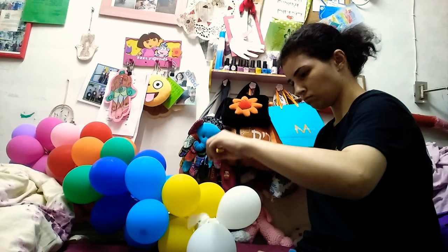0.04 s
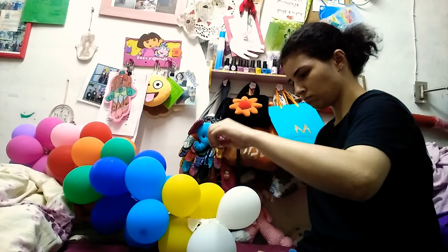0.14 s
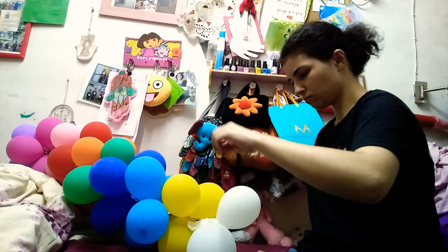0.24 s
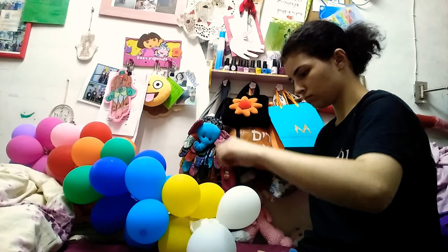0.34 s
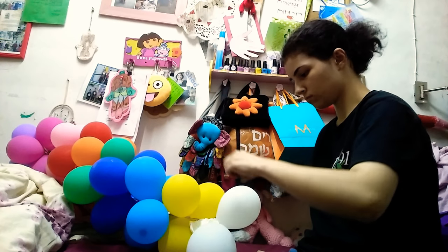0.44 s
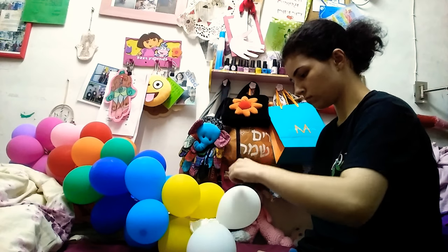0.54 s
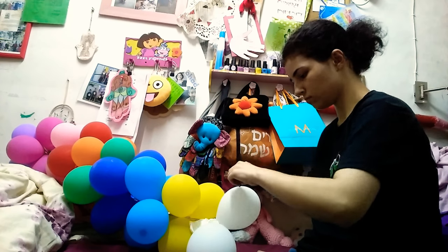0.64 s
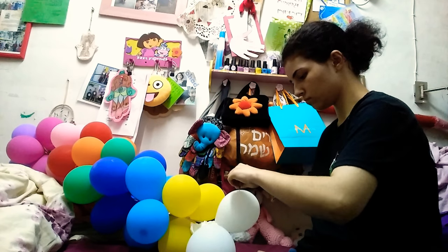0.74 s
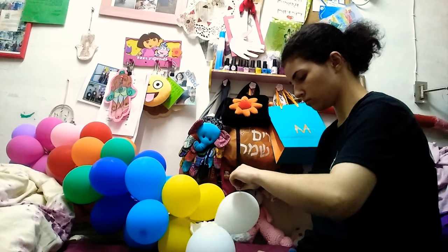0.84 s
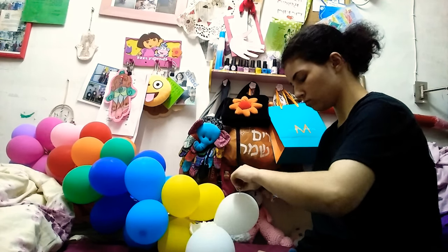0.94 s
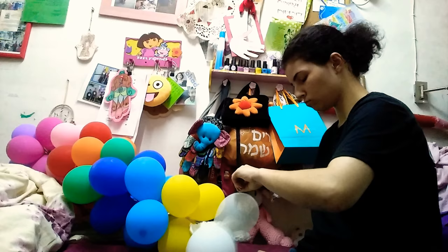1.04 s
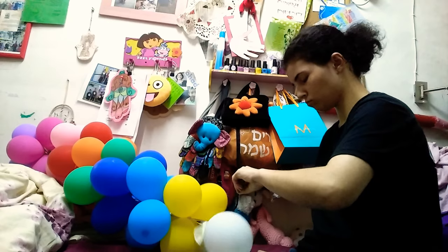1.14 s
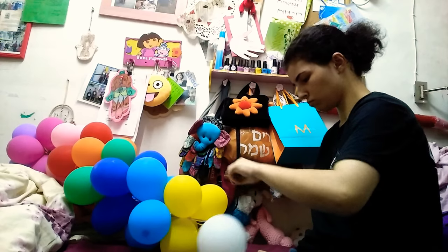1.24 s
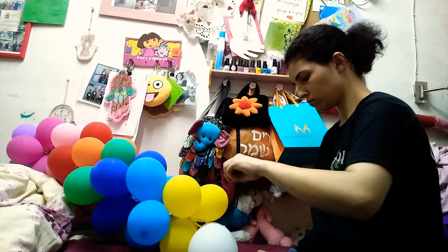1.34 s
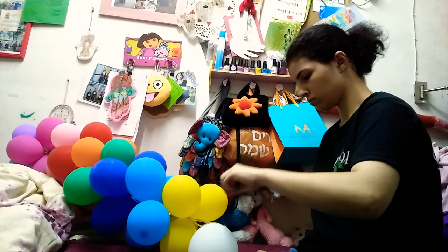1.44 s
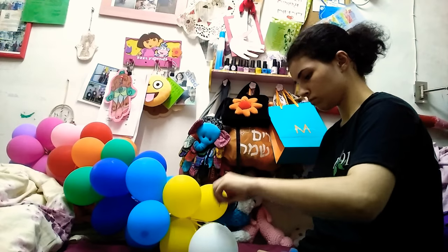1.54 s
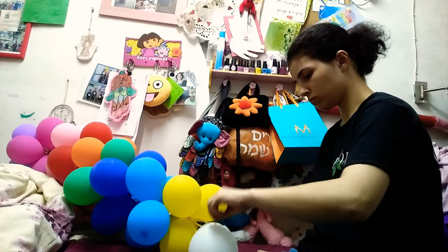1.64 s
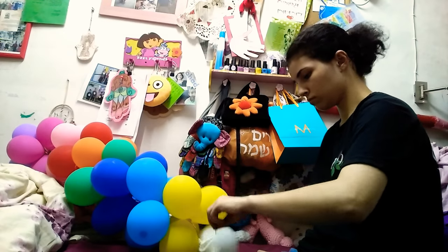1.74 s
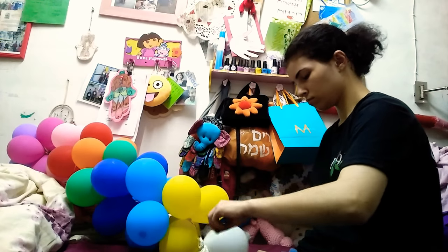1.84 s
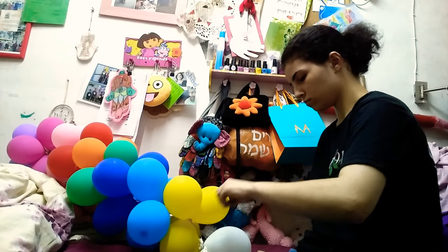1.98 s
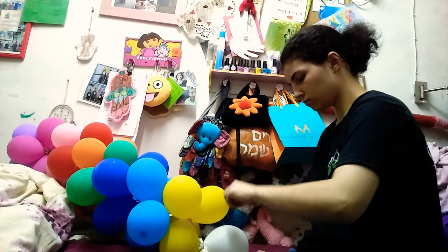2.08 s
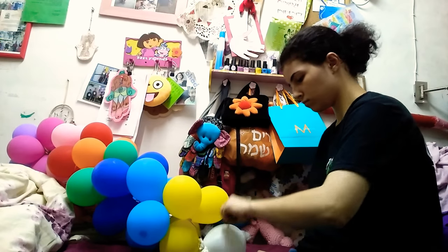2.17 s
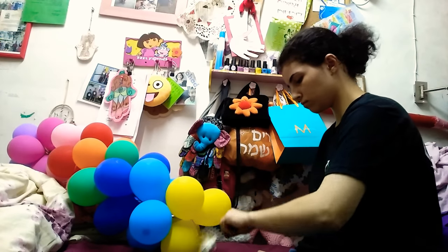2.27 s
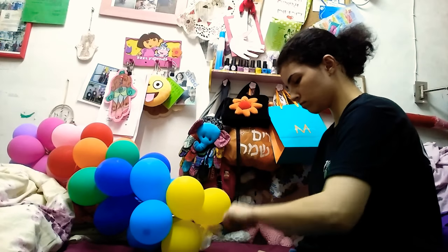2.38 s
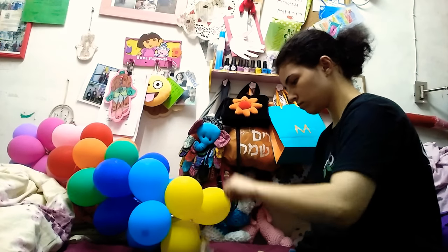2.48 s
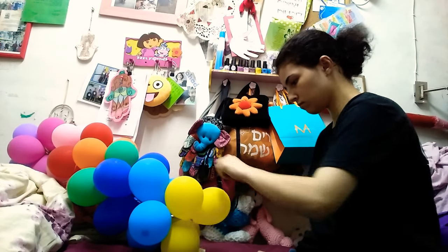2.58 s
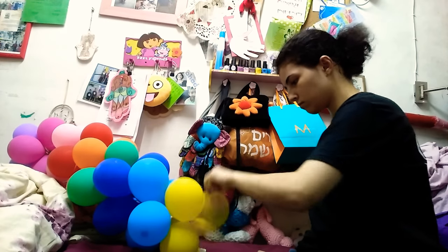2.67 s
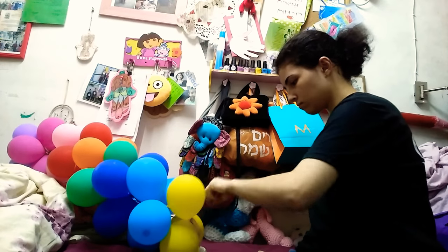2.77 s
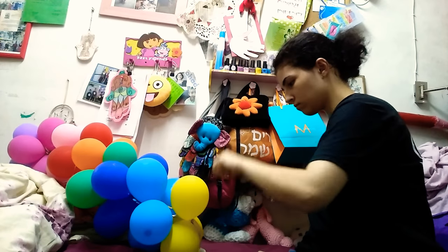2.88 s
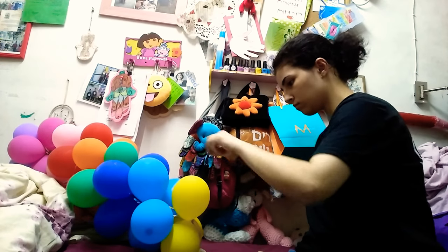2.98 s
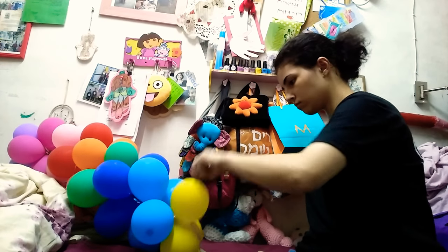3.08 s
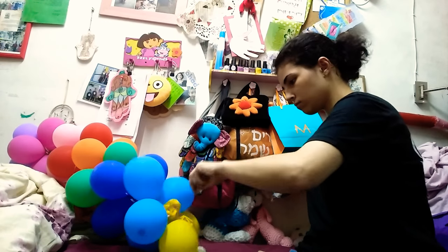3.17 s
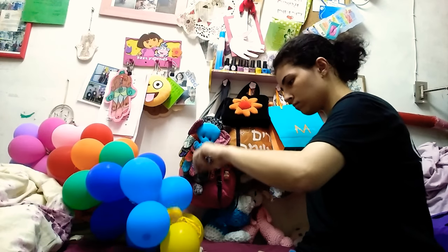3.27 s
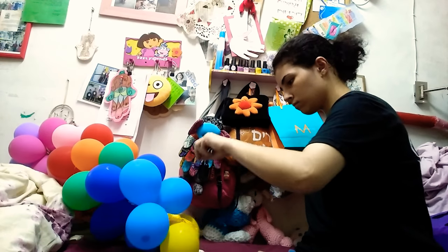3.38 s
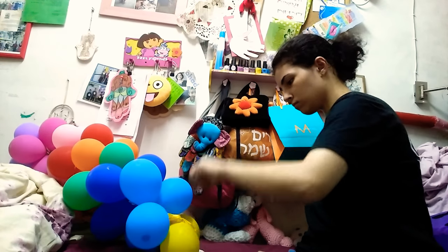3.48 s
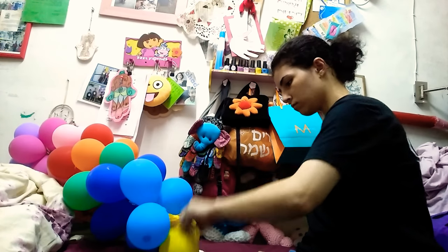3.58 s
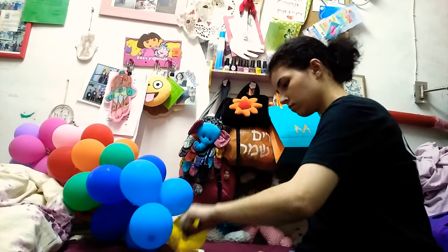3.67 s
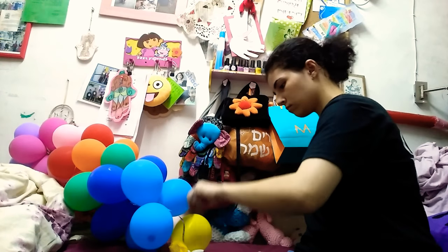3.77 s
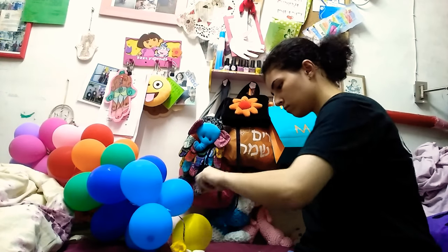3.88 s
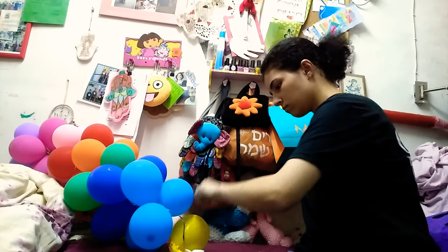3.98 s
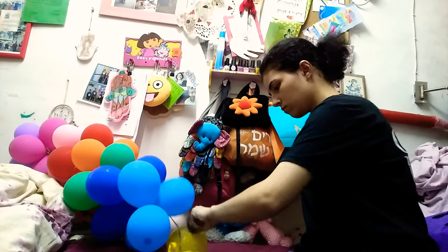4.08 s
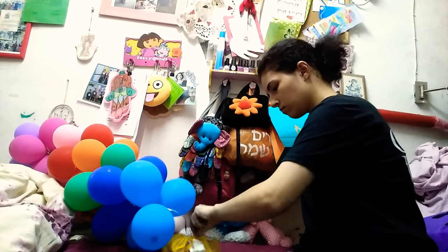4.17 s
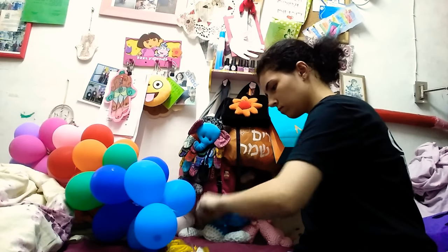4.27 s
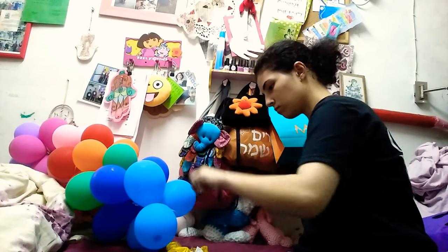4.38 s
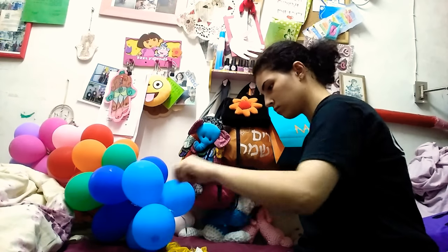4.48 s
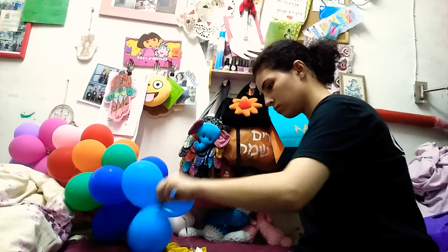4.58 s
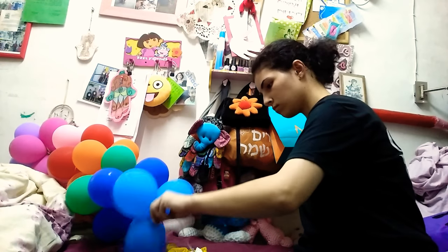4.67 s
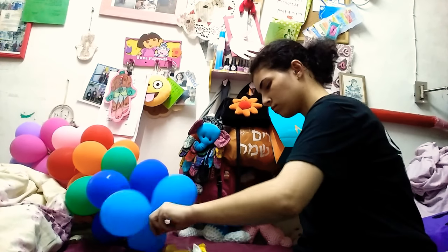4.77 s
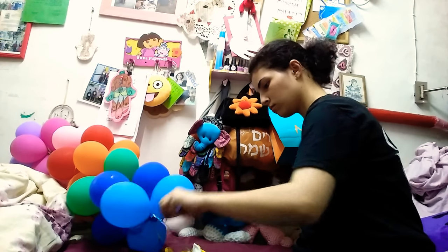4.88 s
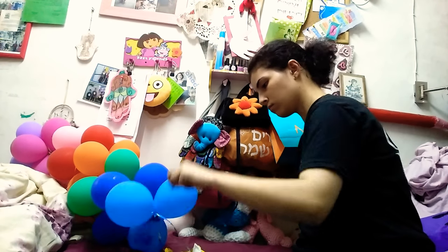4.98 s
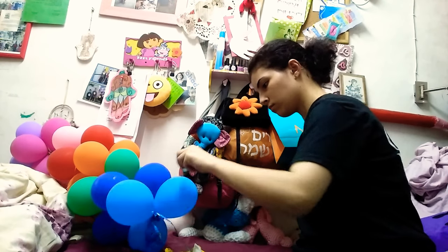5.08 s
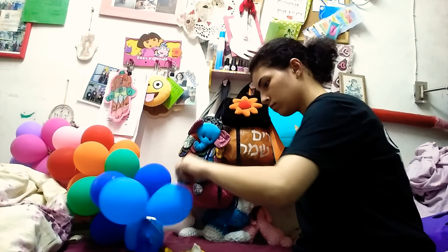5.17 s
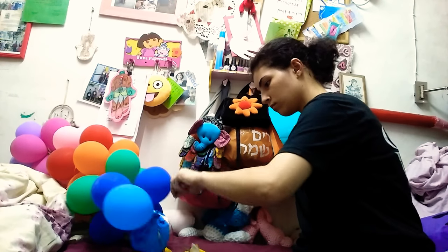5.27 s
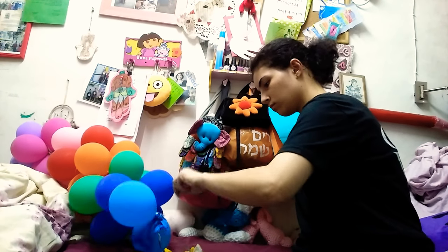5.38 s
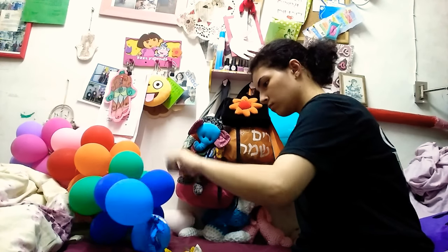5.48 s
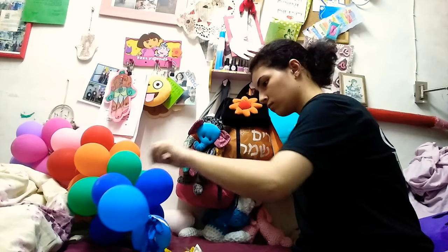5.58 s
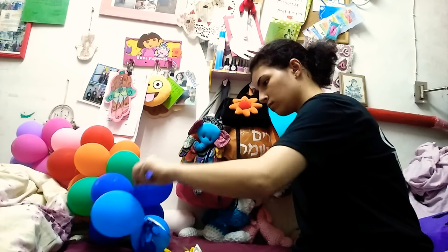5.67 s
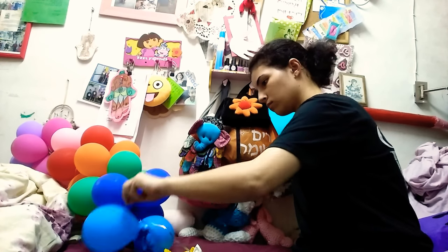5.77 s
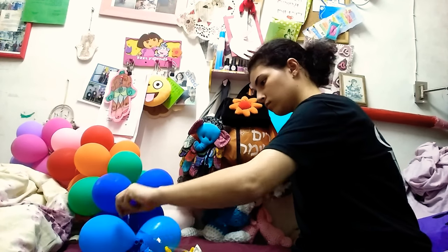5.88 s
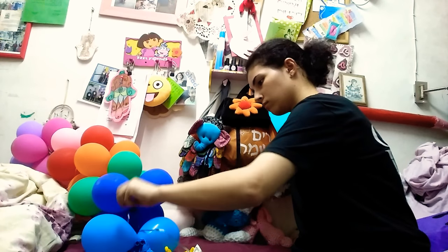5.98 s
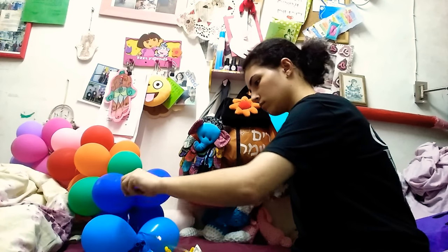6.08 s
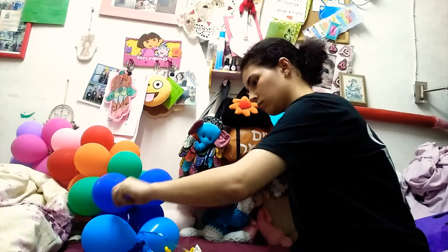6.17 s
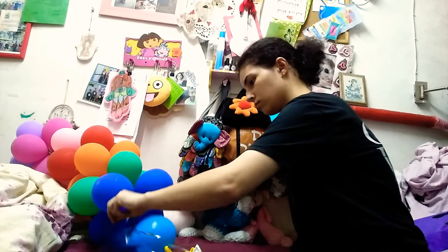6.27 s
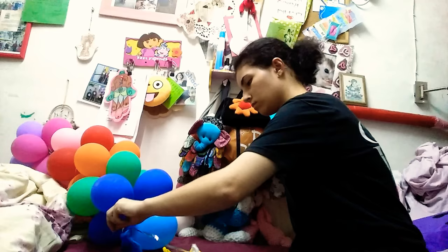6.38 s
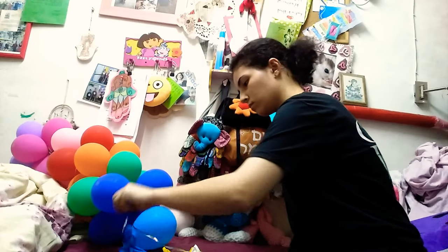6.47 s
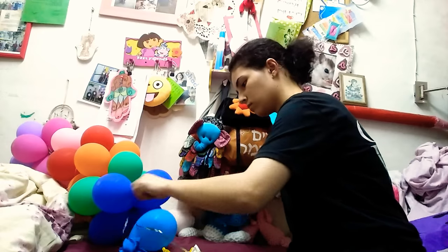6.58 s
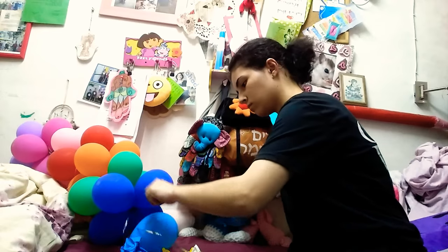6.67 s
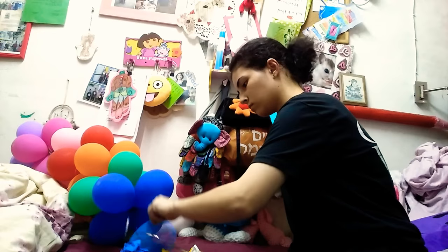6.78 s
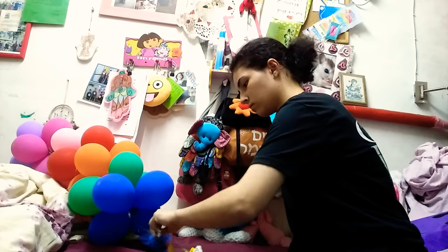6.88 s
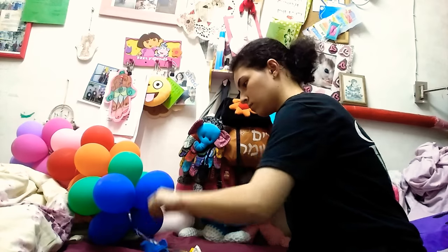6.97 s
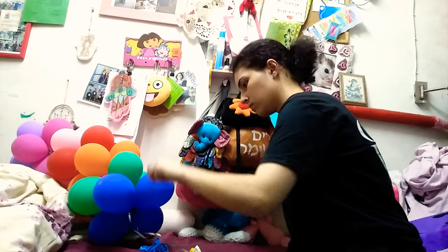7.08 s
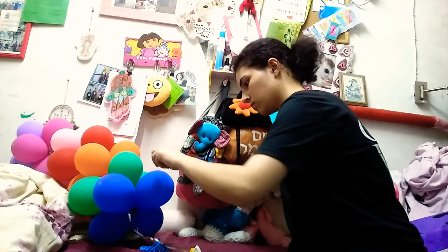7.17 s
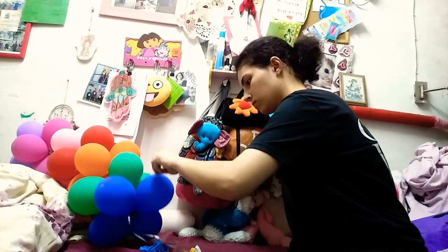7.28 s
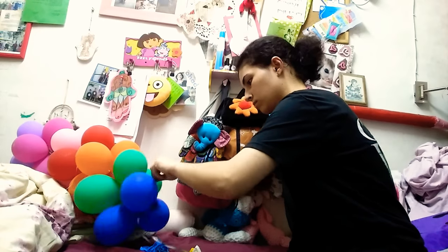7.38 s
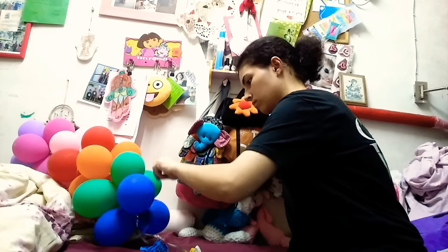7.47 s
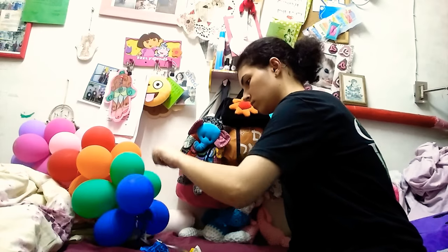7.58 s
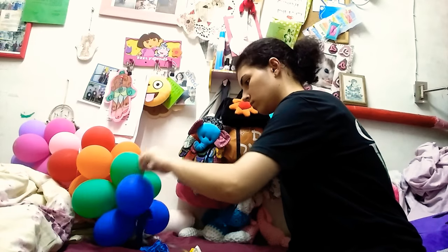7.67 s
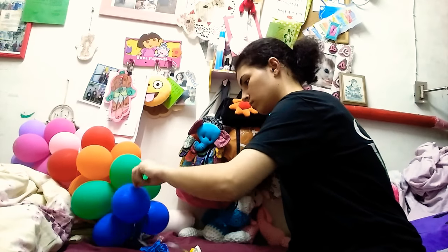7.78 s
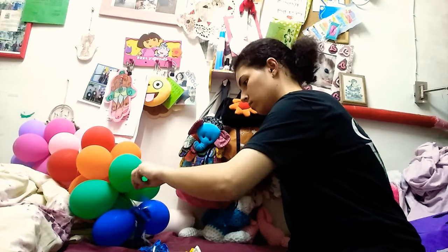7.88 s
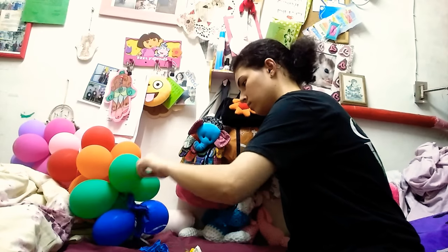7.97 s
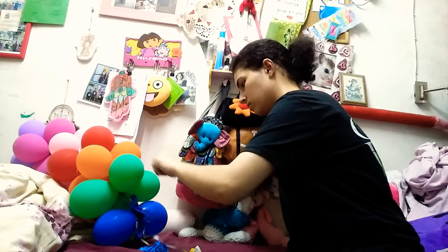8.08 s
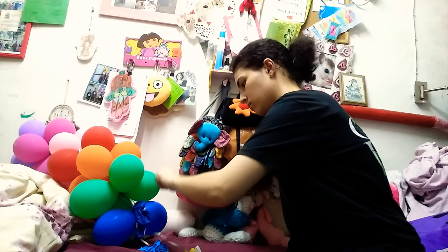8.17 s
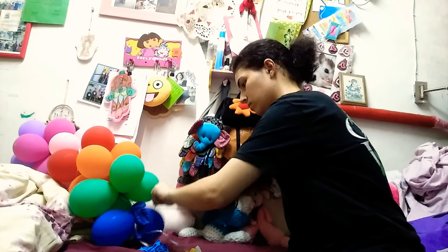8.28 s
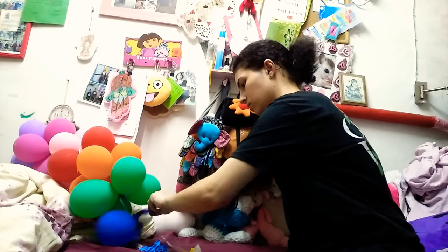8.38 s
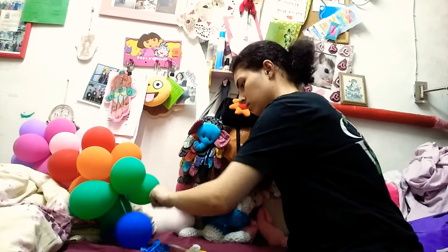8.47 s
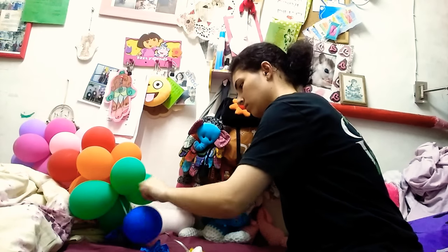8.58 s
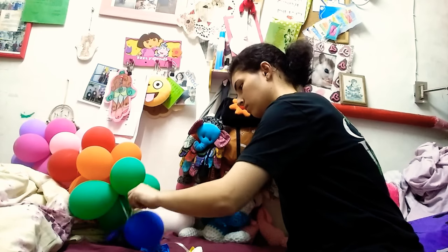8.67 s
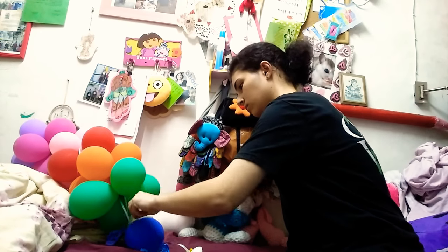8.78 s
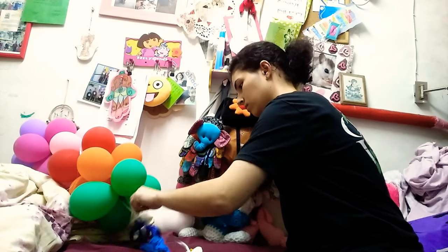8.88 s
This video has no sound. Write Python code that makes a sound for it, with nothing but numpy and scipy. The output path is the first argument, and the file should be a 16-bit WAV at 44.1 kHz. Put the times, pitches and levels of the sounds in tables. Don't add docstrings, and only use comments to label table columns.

```python
import sys
import numpy as np
from scipy import signal
from scipy.fft import rfft, irfft, next_fast_len
from scipy.io import wavfile
from scipy.ndimage import uniform_filter1d

SR = 44100
rng = np.random.default_rng(int(sys.argv[2]) if len(sys.argv) > 2 else 0)


def persist_wave(psi):
    counts = np.round(np.clip(psi, -1, 1) * 32767).astype(np.int16)
    wavfile.write(sys.argv[1], SR, np.atleast_2d(counts).T)


def rack_gain(trim_db):
    fader = np.asarray(trim_db, float)
    return 10 ** (fader / 20)


N = 394254
SPAN = 10240
THUD_HZ = 305

# start_s, pulse_db, pulse_hz, room_db, room_tilt (dB per octave about 700 Hz)
BURSTS = [(1.0601, 9.5, 794, -6.5, -0.1), (1.7172, 8.5, 760.4, -4, 0.2), (2.2460, 9, 798.2, -6, -0.3),
          (2.6891, 8, 850, -7, -0.6), (3.1499, 2.5, 807, -10, 1.34), (3.6370, 10.5, 850, -9, 3.5),
          (4.1040, 11.5, 838.7, -5.5, 1.76), (4.6882, 7.5, 850.3, -7, 1.01), (5.2254, 7, 769.7, -5.5, 0.34),
          (6.2734, 7.5, 874, -6.5, 0.1), (6.7929, 9.5, 832.6, -6, -0.5), (7.3093, 7, 800, -7.5, -0.4),
          (7.8095, 7, 799, -9, 0.46), (8.3608, 7.5, 846.5, -8, 0.1), (8.8323, 6.5, 851, -9.5, 0.5)]
# pitch_hz, level_db (per Hz)
TEAR_ROOM = [(59, -46), (100, -18.5), (277, -9), (558, -13.5), (1080, -19.5), (1520, -10), (3860, -8.5),
             (6990, -13.5), (10500, -8), (12700, -17), (15000, -17.5), (16000, -33.5)]


def rms_one(x):
    return x / np.sqrt(np.mean(x ** 2, axis=(-2, -1), keepdims=True) + 1e-20)


def at_hz(points, hz):
    point_hz, value = np.array(points).T
    return np.interp(np.log(hz + 1), np.log(point_hz), value)


def stereo_spectrum(colour, shape):
    # pitch_hz, likeness (0 to 1)
    likeness = [(60, 0.79), (150, 0.43), (330, 0.99), (550, 0.53), (950, 0.27), (2400, 0.4), (6000, 0.033),
                (15000, .02)]
    # pitch_hz, left_right_db
    ports = [(60, -0.75), (160, 1.5), (400, 3), (900, -1.6), (2000, 3.5), (4500, 3), (7000, 6.5),
             (9000, -6), (11000, -5.5), (12200, 9.5), (14000, 11), (16000, 10)]
    events, samples = shape
    hz = np.arange(samples // 2 + 1) * SR / samples
    mid, side = rfft(rng.standard_normal((events, 2, samples))).transpose(1, 0, 2)
    alike = np.clip(at_hz(likeness, hz), 0, 1)
    mid = np.sqrt(1 + alike) * mid
    side = np.sqrt(1 - alike) * side
    lean = rack_gain(at_hz(ports, hz) / 2)
    both = np.stack([(mid + side) * lean, (mid - side) / lean], axis=1)
    return both * rack_gain(at_hz(colour, hz))


def steady(colour):
    size = next_fast_len(N, True)
    noise = irfft(stereo_spectrum(colour, (1, size)), size)
    return rms_one(noise[0, :, :N])


def room_answers(colour, count, same, rise_s, grain_db):
    # pitch_hz, t60_s
    room_t60 = [(60, 0.043), (160, 0.18), (380, .135), (700, .12), (1200, 0.11), (2900, 0.13), (8000, .145),
                (14500, 0.15)]
    common = np.sqrt(same) * stereo_spectrum(colour, (1, SPAN))
    own = np.sqrt(1 - same) * stereo_spectrum(colour, (count, SPAN))
    spectra = rfft(rms_one(irfft(common + own)))
    t = np.arange(SPAN) / SR
    hz = np.arange(SPAN // 2 + 1) * SR / SPAN
    band_hz = np.array(room_t60)[:, 0]
    tail = 0
    for share, (_, t60) in zip(np.eye(len(room_t60)), room_t60):
        band = at_hz(np.c_[band_hz, share], hz)
        tail = tail + irfft(spectra * band) * rack_gain(-60 * t / t60)
    echoes = rms_one(uniform_filter1d(rng.standard_normal((count, 1, SPAN)), size=60))
    return tail * rack_gain(grain_db * echoes) * (1 - np.exp(-(t / rise_s) ** 2))


def struck(hz, t60, lag_s=0.):
    t = np.maximum(np.arange(SPAN) / SR - lag_s, 0)
    return np.sin(2 * np.pi * np.reshape(hz, (-1, 1, 1)) * t) * rack_gain(-60 * t / t60)


def skin_rings(count, t60):
    # pitch_hz, level_db (per Hz)
    skin_colour = [(200, -26.5), (400, -11.5), (650, -13.5), (950, 1.5), (1250, -4.5), (1500, -22.5),
                   (2500, -46)]
    t = np.arange(SPAN) / SR
    modes = rms_one(irfft(stereo_spectrum(skin_colour, (count, SPAN))))
    return modes * (1 - np.exp(-t / 0.0009)) * rack_gain(-60 * t / t60)


def resonate(x, modes):
    out = 0
    for hz, width_hz, db in modes:
        r = np.exp(-np.pi * width_hz / SR)
        poles = [1, -2 * r * np.cos(2 * np.pi * hz / SR), r * r]
        out = out + rack_gain(db) * signal.lfilter([1 - r * r, 0, r * r - 1], poles, x)
    return rms_one(out)


def strokes(rows, fall_db_per_s):
    rise_db_per_s = 1300
    start_s, hold_s, db, second_db = np.transpose(rows)[:, :, None]
    t = np.arange(0, N, 64) / SR
    rise_db = rise_db_per_s * np.maximum(start_s - t, 0)
    fall_db = fall_db_per_s * np.maximum(t - start_s - hold_s, 0)
    first = rack_gain(db - rise_db - fall_db)
    second = first * rack_gain(second_db)
    return np.array([np.interp(np.arange(N) / SR, t, np.sum(g ** 2, axis=0)) for g in (first, second)])


def lay_out(times, sounds, pan_db):
    out = np.zeros((2, N + SPAN))
    for start_s, sound, db in zip(times, sounds, pan_db):
        start = round(start_s * SR)
        out[:, start:start + SPAN] += sound * rack_gain(np.array([[db / 2], [-db / 2]]))
    return out[:, :N]


def hum():
    # pitch_hz, level_db (per Hz)
    hum_colour = [(35, -36.5), (60, -13.5), (105, -3.5), (200, -8), (305, -1), (700, -11), (1050, -13),
                  (1500, -17), (2770, -20.5), (3750, -20), (4320, -22), (8500, -33), (10800, -29.5),
                  (12100, -38)]
    # pitch_hz, level_db (rms)
    whines = [(3510, -85), (3666, -87), (3778.5, -86), (3828.5, -78.5), (10724, -89), (15536, -96)]
    hum_db, mains_hz = -62.5, 50
    t = np.arange(N) / SR
    throb = 1 + .8 * np.cos(2 * np.pi * mains_hz * t + 1.3)
    whine = sum(np.sqrt(2) * rack_gain(db) * np.sin(2 * np.pi * hz * t) for hz, db in whines)
    return rack_gain(hum_db) * steady(hum_colour) + throb * whine


def rustle():
    # pitch_hz, width_hz, level_db
    squeak = [(327, 97, -3), (634, 140, -4), (920, 70, 0), (1010, 60, 2), (1050, 50, 3), (1320, 21, -2.5)]
    high_squeak = [(2050, 110, 0.5), (1900, 150, -8)]
    # pitch_hz, level_db (per Hz)
    cloth = [(820, -36), (1400, -5), (1990, -3), (3030, -7), (3270, -1.5), (7500, -15), (9750, -45),
             (16500, -120)]
    airy_hiss = [(4410, -39), (7500, -11.5), (8650, -6), (10700, 2), (12600, -13.5), (15100, -10.5),
                 (16000, -14.5)]
    # start_s, hold_s, squeak_db, high_squeak_db (relative)
    rubs = [(0.0, .065, -57.5, -16), (0.636, 0.013, -66.5, -1), (0.69, 0.044, -61.5, -2),
            (0.78, .12, -63.5, -9), (0.93, .06, -70, -12), (1.33, 0.033, -59, -10),
            (1.67, .04, -61.5, -13.5), (1.86, .06, -63, -25), (2.19, .03, -64, -11),
            (2.5, 0.054, -66.5, -17), (2.98, .04, -66.5, -15.5), (3.42, 0.058, -64, -20),
            (3.828, 0.018, -56.5, -24), (4.585, .09, -53, -17), (4.82, 0.085, -62, -15.5),
            (5.15, .07, -60, -13.5), (5.42, .16, -66, -20), (5.74, 0.031, -62, -21),
            (5.835, .1, -66.5, -20), (6.008, 0.014, -69, -14), (6.62, 0.021, -67, -8),
            (6.72, .04, -61, -15.5), (7.08, 0.028, -60.5, -4), (7.135, 0.054, -61.5, -6),
            (7.25, .05, -58.5, -10), (7.69, 0.075, -62, -11), (8.27, 0.076, -58, -17),
            (8.64, 0.064, -66, -15), (8.745, .05, -64.5, -13)]
    # start_s, hold_s, cloth_db, hiss_db (relative)
    brushes = [(0.0, .08, -65, -6), (0.7, .045, -71, -12), (1.3, .06, -69, -8), (1.67, .04, -71.5, 0),
               (2.136, .06, -77, -2), (2.55, .05, -71.5, -8), (3.04, .04, -70, -20),
               (3.828, .015, -64, -9.5), (3.97, .04, -73, -12), (4.59, .09, -62.5, -5),
               (4.85, 0.045, -66, -6), (5.16, .06, -65, -7), (5.742, .02, -68, -8), (5.836, .03, -74, -3),
               (6.007, .02, -64.5, -5), (6.4, .2, -67, 2), (6.72, .04, -67.5, -4), (7.08, .03, -48, -7),
               (7.145, .04, -56.5, -11), (7.24, 0.067, -67, -9), (7.735, .05, -65, 3), (8.28, .06, -73, -3),
               (8.64, .06, -75, -10), (8.745, 0.016, -65, -11)]
    # hold_s, level_db, second_db (relative)
    settle_rub, settle_brush = (.17, -63.5, -15.5), (0.3, -71, -3)
    stroke_fall_db_per_s, settle_fall_db_per_s = 300, 65
    slips_per_s = 1500

    slips = (rng.random((2, N)) < slips_per_s / SR) * rng.standard_normal((2, N))
    slips = slips + 0.44 * slips[::-1]
    grain_steps = np.repeat(rng.standard_normal(N // 128 + 1), 128)[:N]
    grain = rack_gain(2.5 * uniform_filter1d(grain_steps, size=128))
    rubber = [resonate(slips, squeak), resonate(slips, high_squeak)]
    bedding = [steady(cloth) * grain, steady(airy_hiss) * grain]

    out = 0
    for layers, rows, settle in ((rubber, rubs, settle_rub), (bedding, brushes, settle_brush)):
        settling = [(burst[0], *settle) for burst in BURSTS]
        powers = strokes(rows, stroke_fall_db_per_s) + strokes(settling, settle_fall_db_per_s)
        for power, layer in zip(powers, layers):
            out = out + np.sqrt(power) * layer
    return out


def taps():
    # start_s, skin_ring_db, tick_db
    touches = [(0.634, -58, -79), (0.696, -64.5, -97), (3.069, -54.5, -59.5), (3.830, -48.5, -62.5),
               (4.595, -60, -62.5), (4.602, -58, -63), (4.6478, -31, -60), (4.6762, -37, -54),
               (5.151, -52, -71), (6.009, -54, -61.5), (7.734, -64, -55), (7.769, -62, -65),
               (8.268, -48, -71), (1.92, -59, -70.5), (2.14, -64.5, -68.5), (5.748, -56, -71),
               (7.082, -60.5, -53), (7.094, -62, -55), (4.005, -44, -62)]
    knock_db = -3
    start_s, skin_db, tick_db = np.transpose(touches)[:, :, None, None]
    drum = skin_rings(len(start_s), .025) + rack_gain(knock_db) * struck(THUD_HZ, .03)
    tick = room_answers(TEAR_ROOM, len(start_s), same=0, rise_s=0.00055, grain_db=1.5)
    return lay_out(start_s.ravel(), rack_gain(skin_db) * drum + rack_gain(tick_db) * tick, np.zeros(len(start_s)))


def tears():
    # start_s, snap_db, room_db, skin_ring_db, left_right_db
    pricks = [(1.0512, -15.5, -28.5, -22.5, 7), (1.7143, -8.5, -10, -33, -2), (2.2249, -9, -24.5, -22, 0),
              (2.6639, -12, -20.5, -18, -0.5), (3.0780, -10.5, -19.5, -18, 0.5),
              (3.5726, -8.5, -19.5, -19, 1), (4.0129, -10, -21, -17, 2), (4.685, -3, -16.5, -25, 0.5),
              (5.2247, -5.5, -14.5, -29, -4), (6.2521, -9.5, -20, -18.5, 2),
              (6.7613, -9.5, -20.5, -19, -4.5), (7.298, -12, -22, -21.5, 2), (7.7870, -6, -23, -17.5, -3.5),
              (8.3487, -11, -21.5, -23.5, -0.5), (8.8218, -14, -23.5, -20, 0.5)]
    # start_s, snap_db, room_db, left_right_db
    rips = [(1.0624, -8.5, -16.5, 2.5), (1.7188, -12.5, -23.5, -1), (2.229, -19.5, -36.5, -4.5),
            (2.2330, -23.5, -38.5, 1), (2.2457, -24.5, -19, -1.5), (2.6913, -20, -19, 0),
            (3.0861, -18.5, -30.5, -0.5), (3.149, -17.5, -26.5, 1.5), (3.156, -11.5, -41, -5.5),
            (3.16, -16.5, -29.5, -4), (3.6367, -3, -21, 2.5), (4.1038, -12.5, -22, 0.5),
            (6.2752, -19, -18, -1), (6.7940, -10.5, -21.5, -2.5), (7.3114, -21, -23, -2),
            (7.8109, -16, -20.5, -0.5), (8.3620, -18.5, -26.5, 0.5), (8.8357, -17, -25, -2.5)]
    slack_skin_db = -38
    rows = [tuple(prick) for prick in pricks]
    rows += [(start_s, snap, room, slack_skin_db, pan) for start_s, snap, room, pan in rips]
    start_s, snap_db, room_db, skin_db, pan_db = np.transpose(sorted(rows))[:, :, None, None]
    count = len(start_s)
    t = np.arange(SPAN) / SR
    bright = rms_one(irfft(stereo_spectrum(TEAR_ROOM, (count, SPAN))))
    snap = bright * (1 - np.exp(-t / 0.000051)) * rack_gain(4.0 - 60 * t / 0.0058)
    skin = rack_gain(1.0) * skin_rings(count, t60=0.071)
    room = room_answers(TEAR_ROOM, count, same=.2, rise_s=.0015, grain_db=1.6)
    sounds = rack_gain(snap_db) * snap + rack_gain(skin_db) * skin + rack_gain(room_db) * room
    return lay_out(start_s.ravel(), sounds, pan_db.ravel())


def bursts():
    # pitch_hz, level_db (per Hz)
    burst_room = [(18, -40), (30, -26.5), (134, -11.5), (239, -10.5), (337, 1.5), (409, -1.5), (551, -5),
                  (698, 3), (983, -2.5), (1120, -4), (1480, -12.5), (2120, -19.5), (3630, -25.5),
                  (4040, -24), (5000, -30), (6500, -59.5), (11000, -120)]
    # pitch_hz, level_db, t60_s
    standing = [(114, -24.5, .15), (356, -16.5, 0.16), (701, -25.5, 0.16), (1090, -25.5, 0.15)]
    thud_t60_s, thud_lag_s, thud_db = .035, .0019, -8.06
    thud_follows = 0.59
    pan_db = -0.57

    start_s, pulse_db, pulse_hz, room_db, tilt_db = np.transpose(BURSTS)[:, :, None, None]
    count = len(start_s)
    t = np.arange(SPAN) / SR
    turns = pulse_hz * t
    pulse = np.sin(2 * np.pi * turns) * np.exp(-((turns - .75) / .55) ** 2)
    thud_hz = THUD_HZ * pulse_hz / pulse_hz.mean()
    thud = np.concatenate([struck(thud_hz * port, thud_t60_s, thud_lag_s) for port in (.975, 1.035)], axis=1)
    blow = pulse + rack_gain(thud_db - (1 - thud_follows) * (pulse_db - pulse_db.mean())) * thud
    blow = signal.sosfilt(signal.butter(1, 60, "high", fs=SR, output="sos"), blow)

    room = rack_gain(3.5) * room_answers(burst_room, count, same=0.43, rise_s=0.0022, grain_db=2.5)
    octaves = np.log2(np.arange(SPAN // 2 + 1) * SR / SPAN / 700 + .1)
    room = irfft(rfft(room) * rack_gain(tilt_db * octaves))
    build_up = 1 - np.exp(-(t / 0.003) ** 2)
    for mode_hz, db, t60 in standing:
        place_db = rng.normal(0, 4.3, (count, 1, 1)) + rng.normal(0, 1.9, (count, 2, 1))
        ring = struck(mode_hz * rng.normal(1, .015, count), t60, thud_lag_s)
        room = room + rack_gain(db + 8 + place_db) * ring * build_up
    return lay_out(start_s.ravel(), rack_gain(pulse_db) * blow + rack_gain(room_db) * room, np.full(count, pan_db))


def scene():
    return hum() + rustle() + taps() + tears() + bursts()


def roll_off(x):
    return signal.sosfilt(signal.butter(12, 16460, fs=SR, output="sos"), x)


def record(dry):
    dry = signal.sosfilt(signal.butter(1, 30, "high", fs=SR, output="sos"), dry)
    knee = 14
    dry = dry / (1 + np.abs(dry) ** knee) ** (1 / knee)
    top = signal.sosfilt(signal.butter(8, 16000, "high", fs=SR, output="sos"), dry)
    converter_offset = .0005
    return roll_off(dry - .6 * top + converter_offset)


dry = scene()
out = record(dry)
persist_wave(out)
```